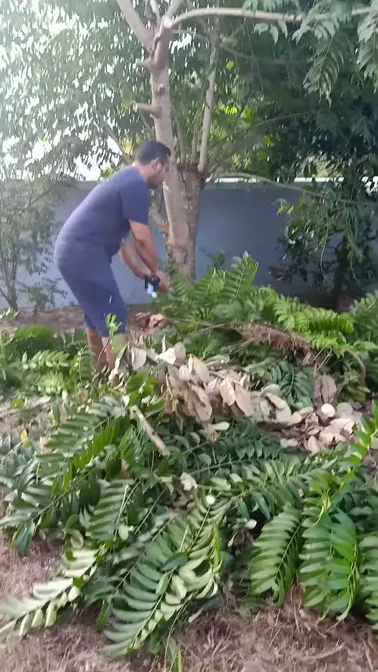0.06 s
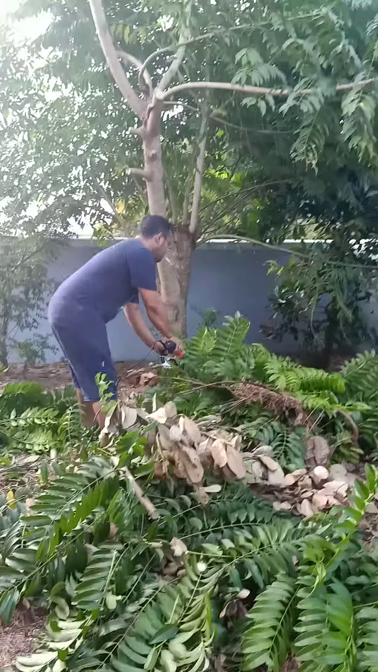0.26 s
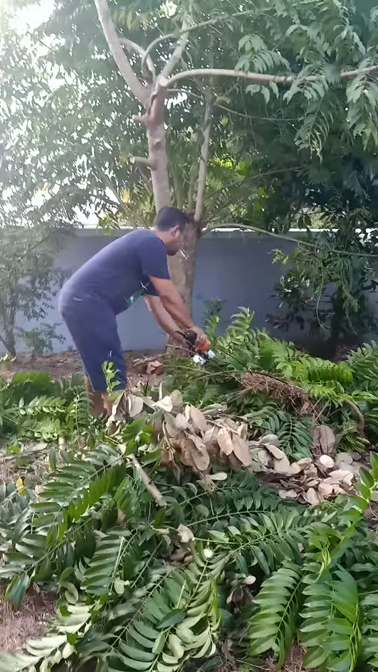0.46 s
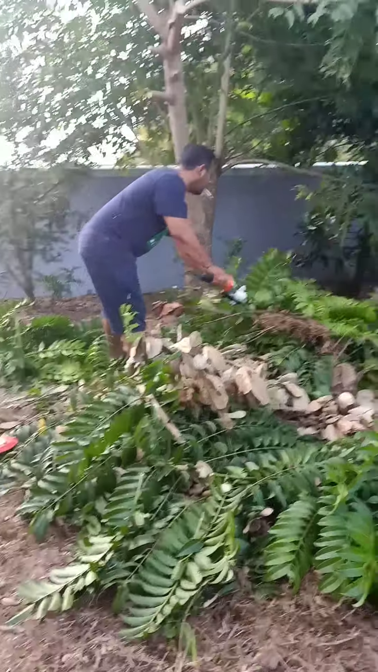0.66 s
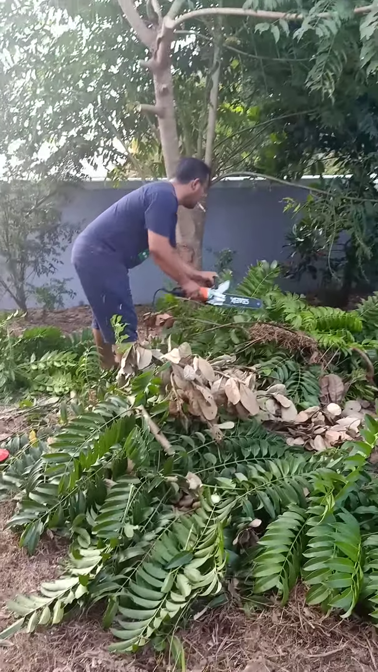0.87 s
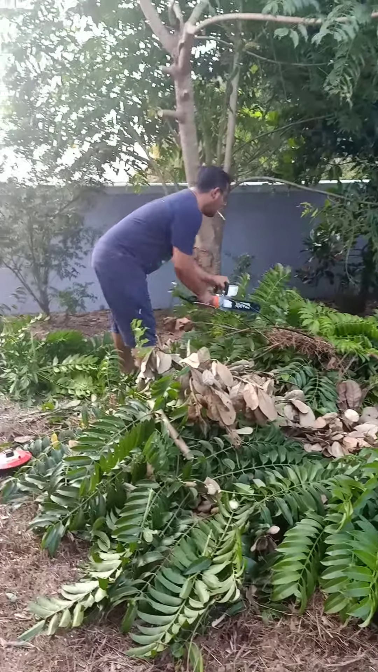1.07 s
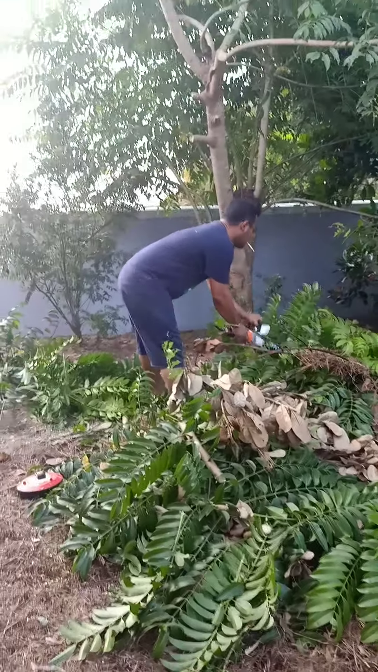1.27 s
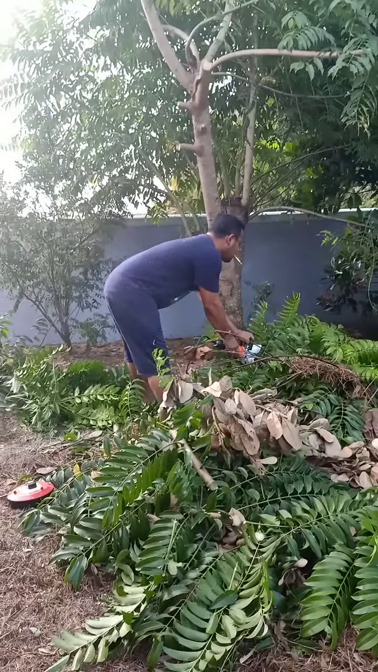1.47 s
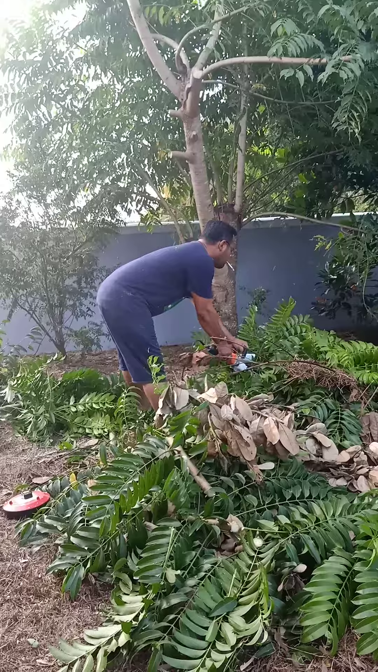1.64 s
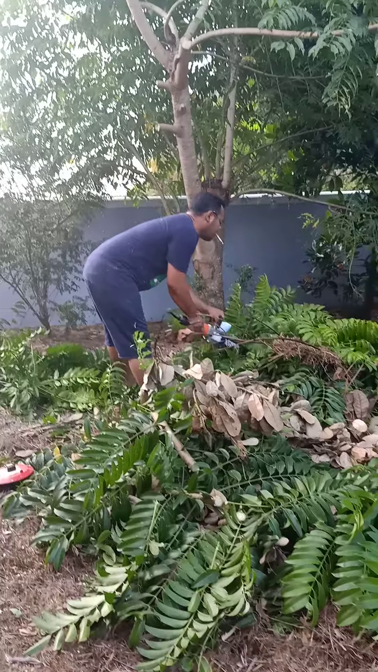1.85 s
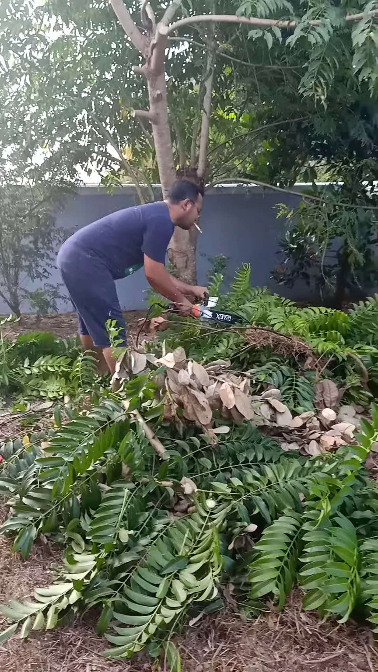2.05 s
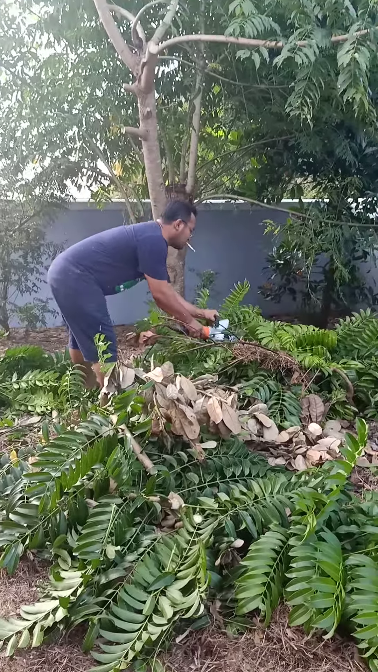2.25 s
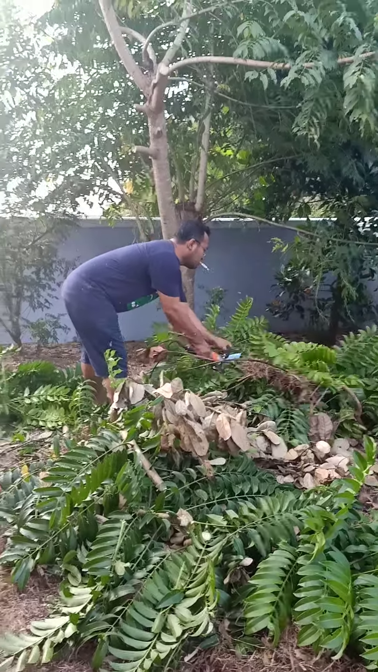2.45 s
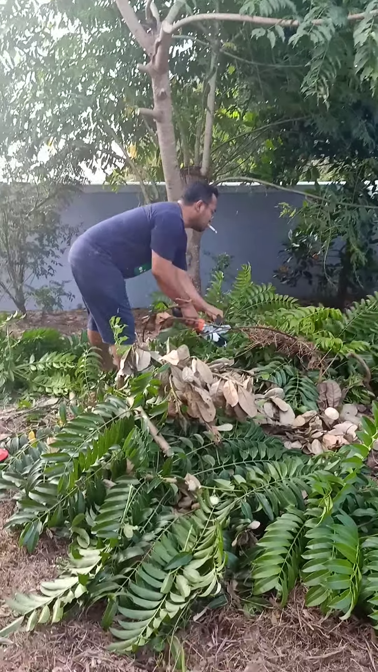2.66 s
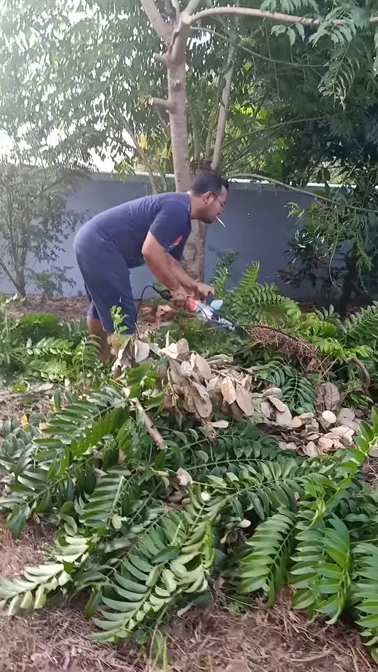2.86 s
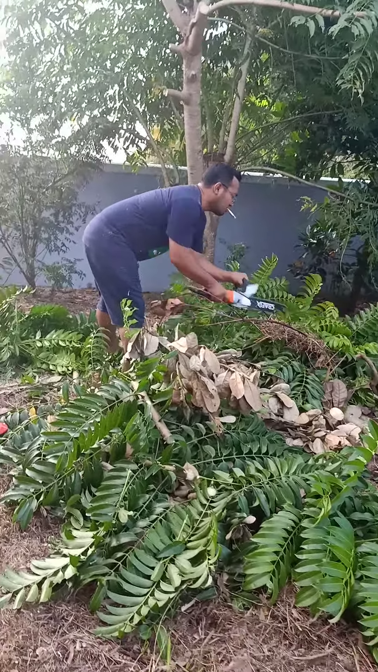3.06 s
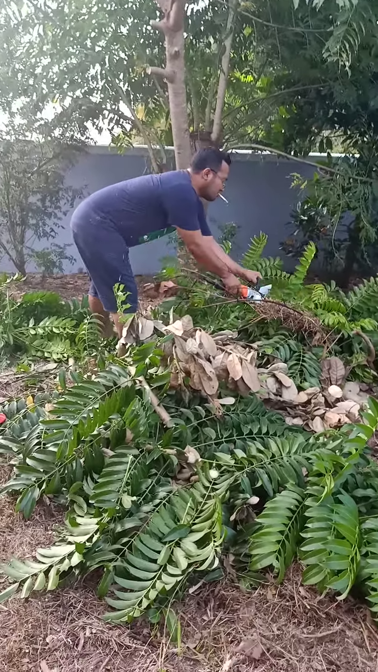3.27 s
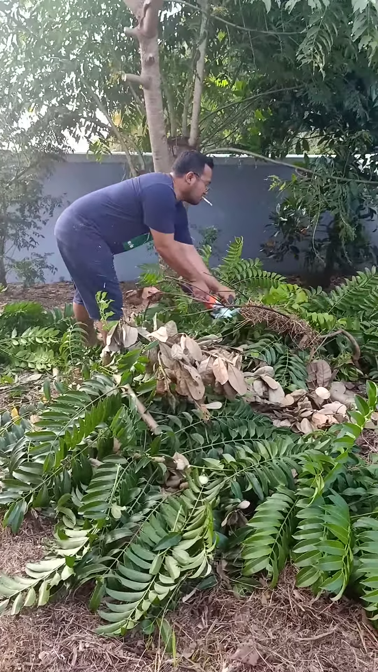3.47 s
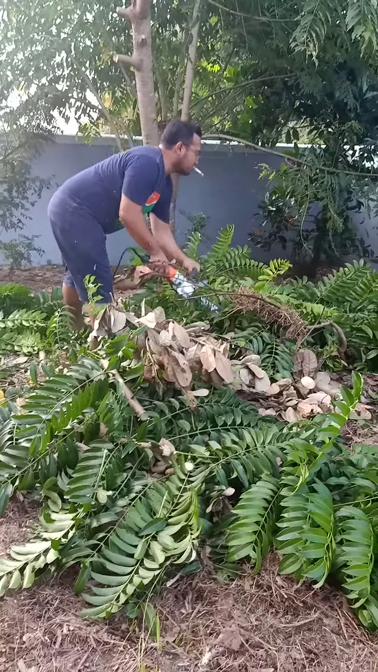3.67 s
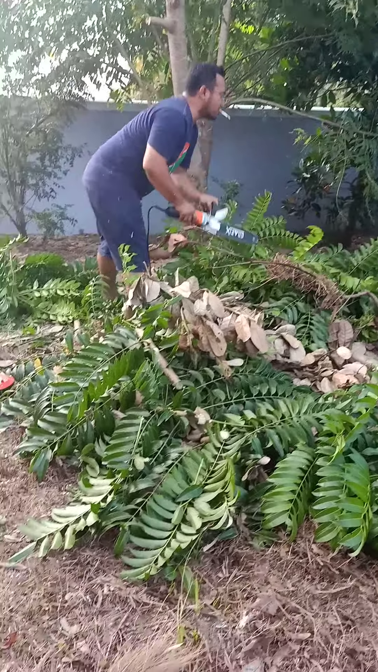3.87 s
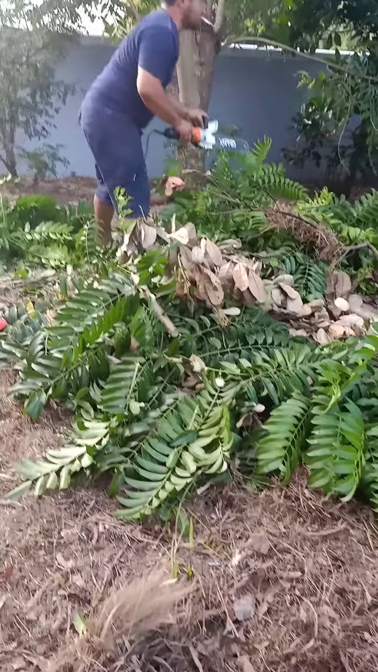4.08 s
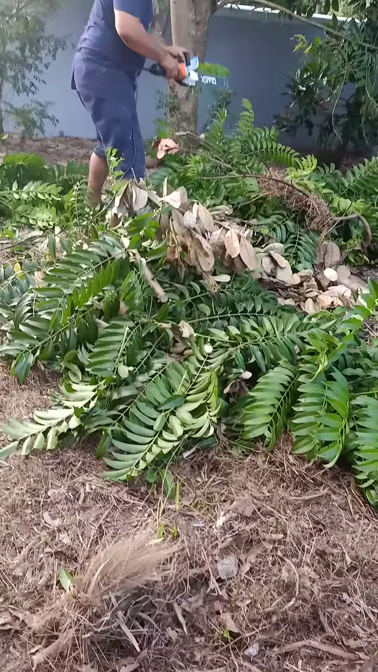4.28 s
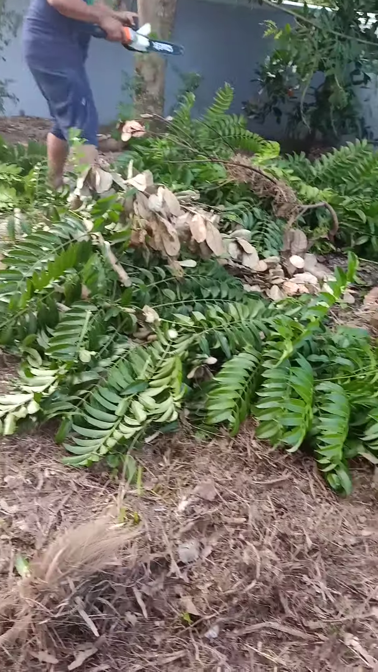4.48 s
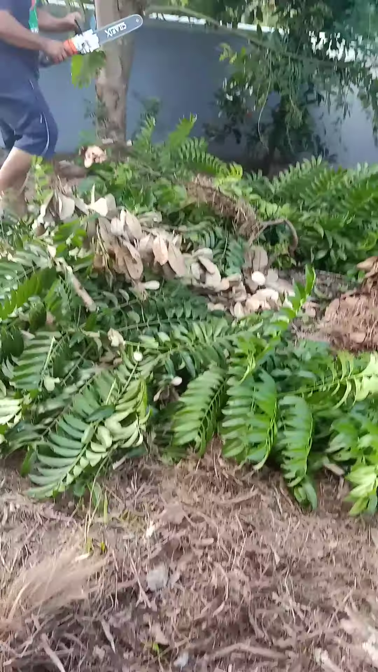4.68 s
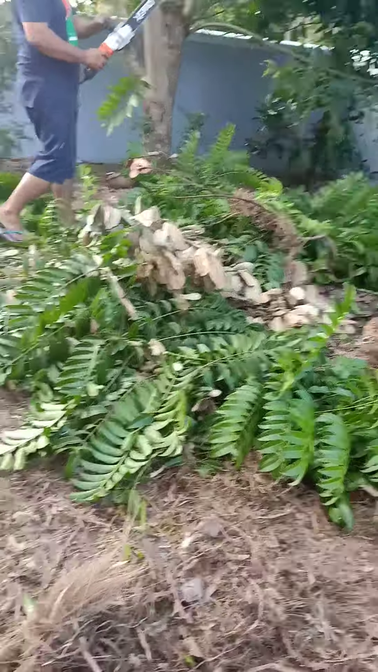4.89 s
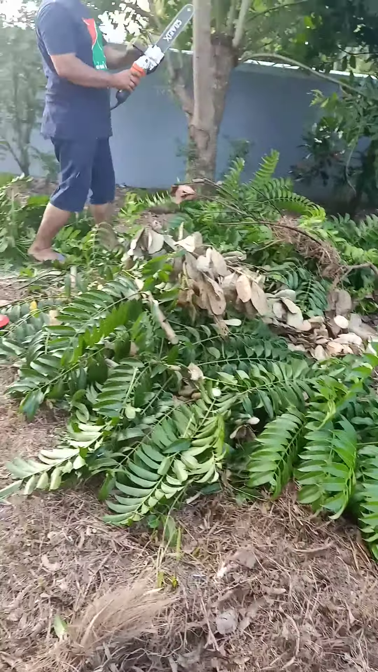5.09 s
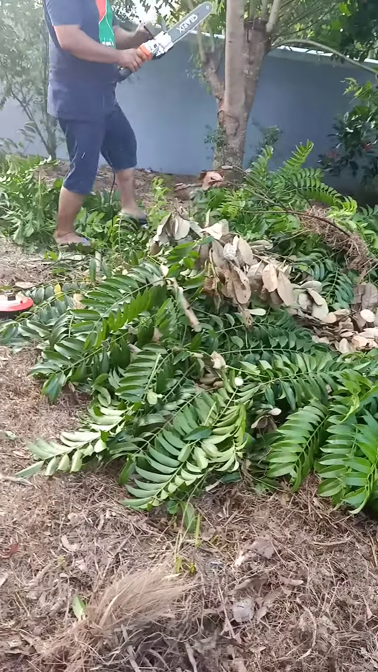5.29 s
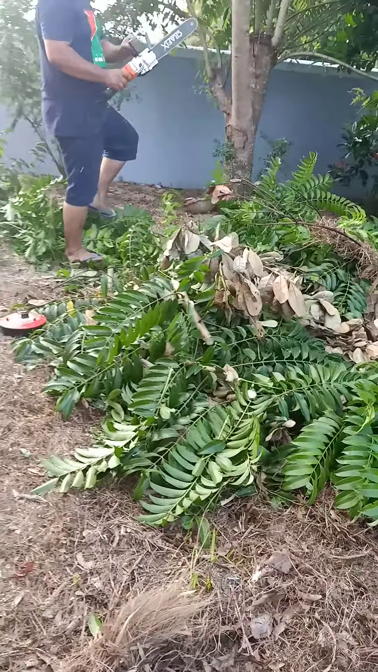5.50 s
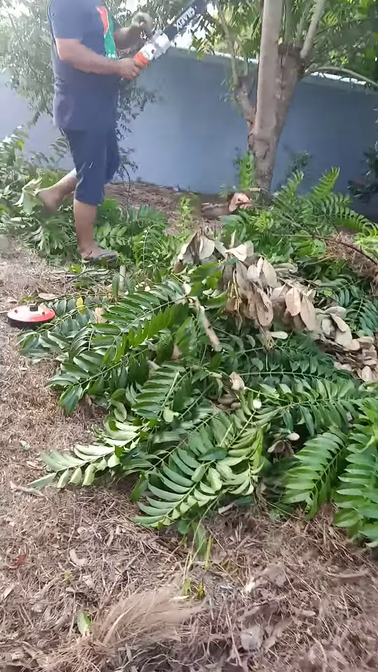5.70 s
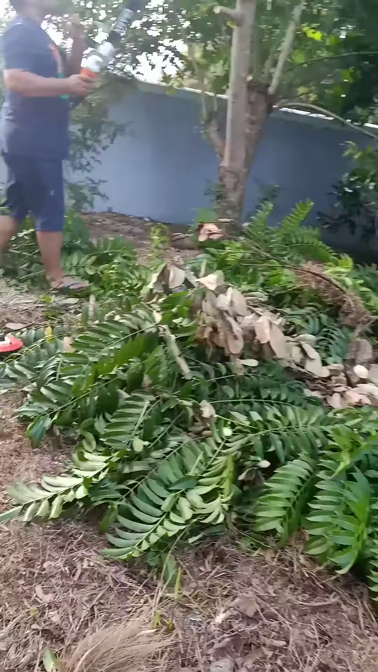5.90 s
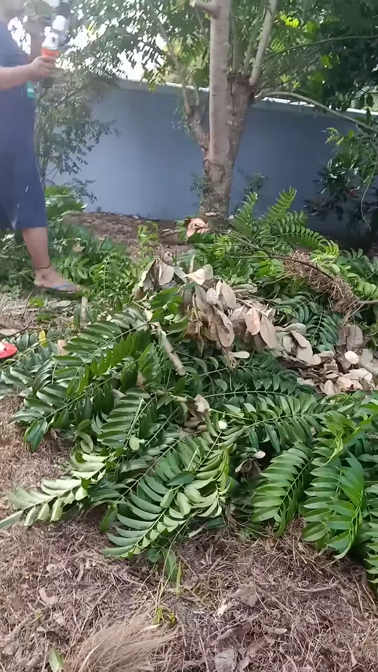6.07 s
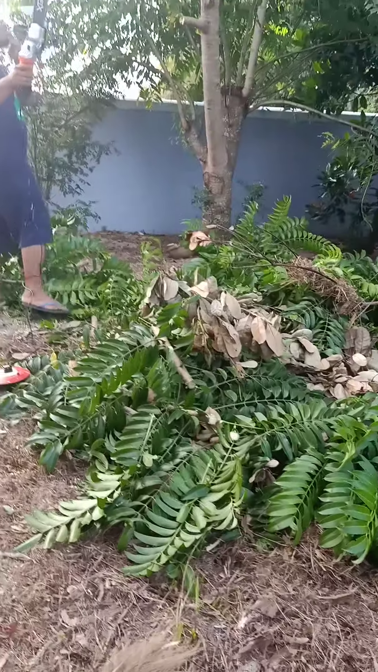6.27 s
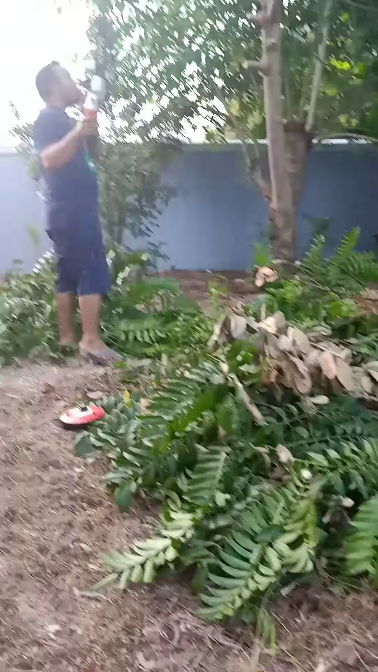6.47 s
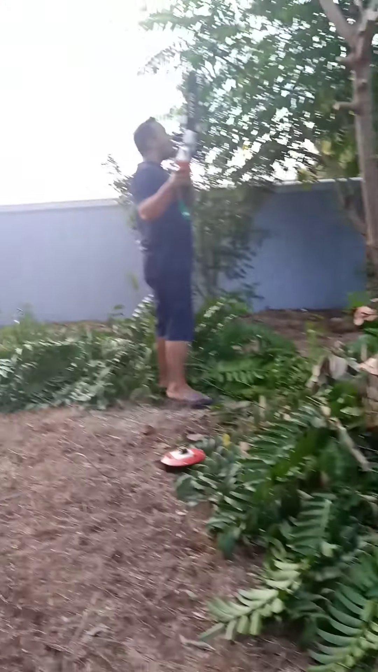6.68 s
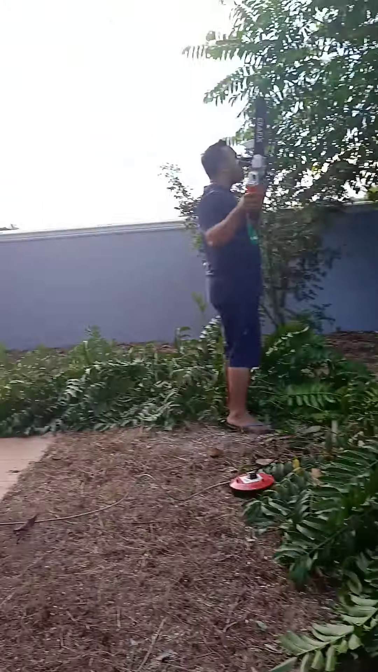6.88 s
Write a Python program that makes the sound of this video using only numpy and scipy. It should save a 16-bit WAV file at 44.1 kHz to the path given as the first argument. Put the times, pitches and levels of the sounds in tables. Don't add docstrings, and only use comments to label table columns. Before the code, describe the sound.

Close outdoors, a small electric chainsaw runs at full speed, a steady whine with harsh metallic chain hiss and case rattle. Its pitch sags briefly at several cuts, with chips spraying and dull branch knocks. After about four seconds it is switched off and slides down to a stop, leaving low distant traffic hum, shrill insects, snapping twigs and a few quick bird whistles. Handheld stereo phone a few metres away.

```python
import sys
import numpy as np
from scipy import signal
from scipy.fft import rfft, irfft, next_fast_len
from scipy.io import wavfile
from scipy.ndimage import uniform_filter1d, map_coordinates

SR = 44100
rng = np.random.default_rng(int(sys.argv[2]) if len(sys.argv) > 2 else 0)


def waveform_to_disk(signal):
    frames = np.transpose(np.atleast_2d(signal))
    scaled = np.clip(frames, -1, 1) * 32767
    samples = np.round(scaled).astype(np.int16)
    wavfile.write(sys.argv[1], SR, samples)


def elevation(decibels):
    levels = np.asarray(decibels, float)
    return 10 ** (levels / 20)


N = 306054

# frequency in Hz, level per Hz in dB.
GARDEN_COLOUR = [(15, -50), (30, -26), (86, -1), (216, -7), (361, -6), (688, -11.5), (1460, -19.5),
                 (2300, -10.5), (3200, -25), (5640, -32.5), (7200, -22.5), (10000, -30.5), (13000, -46),
                 (15600, -50)]
# frequency in Hz, likeness from 0 to 1.
GARDEN_LIKENESS = [(60, 1), (180, 0.89), (550, 0.71), (1650, 0.02), (4970, 0.11), (15000, 0.02)]
# frequency in Hz, left minus right in dB.
GARDEN_LEAN = [(60, 0), (150, -1), (380, -2), (950, -0.5), (2380, 0), (5980, 4.5), (15000, -6)]
# centre in Hz, width in Hz, gain in dB.
INSECTS = (7100, 500, 5.2)
# pitch in Hz, wander in Hz, level in dB, start in seconds, end in seconds.
FAR_MACHINES = [
    (106, 5, -71, -1, 8),
    (200, 3, -74, -1, 8),
    (146, 3, -66, .25, 1),
    (264, 1.5, -67, 6.3, 8),
    (441, 3, -77, 5.8, 8),
    (352, 3, -76, 6.3, 8),
    (533, 2, -77, 6.3, 8),
]
# start in seconds, length in seconds, first
# pitch in Hz, last pitch in Hz, peak in dB.
BIRD_NOTES = [(6.155, .055, 15300, 13900, -78), (6.275, .04, 2000, 1980, -74),
              (6.31, .035, 2050, 2700, -74), (6.325, .045, 1580, 1750, -70), (6.352, .042, 1900, 3080, -62),
              (6.386, .05, 3080, 2850, -67), (6.36, .03, 1980, 1850, -59), (6.385, .11, 1800, 1600, -71),
              (6.43, .075, 2600, 3030, -69), (6.505, .04, 2450, 2150, -69), (6.545, .06, 3500, 3900, -75),
              (6.573, .02, 2220, 2250, -67), (6.594, .026, 2240, 2120, -68), (6.608, .047, 3350, 4000, -74),
              (6.72, .026, 1980, 2220, -64), (6.74, .02, 2180, 2400, -55.5),
              (6.757, .02, 2430, 2720, -57.5), (6.777, .022, 2500, 2450, -65),
              (6.801, .02, 2400, 2600, -50.5), (6.812, .05, 2300, 1900, -72),
              (6.804, .036, 2450, 3130, -59), (6.838, .04, 3100, 3140, -70)]
# start in seconds, peak in dB, left minus right in dB.
TWIG_SNAPS = [(6.0844, -47, -1.0), (6.2594, -58, 0.5), (6.3194, -57, -4), (6.37, -62, 1.5),
              (6.42, -61, -1.5), (6.47, -62, 1.5), (6.51, -61, 0.5), (6.544, -49.5, 0.5), (6.561, -49.5, 4),
              (6.5844, -51, -2), (6.6014, -56, 1.0)]
# start in seconds, peak in dB, pitch in Hz.
BRANCH_BUMPS = [
    (.945, -45, 262),
    (1.515, -44, 345),
    (2.59, -46, 310),
    (3.55, -50, 300),
    (5.84, -58, 420),
    (6.13, -56, 1720),
]
# start in seconds, length in seconds,
# turns per second lost each second.
CUTS = [
    (.34, .13, 144),
    (.53, .24, 33),
    (.77, .3, 15),
    (1.38, .18, 45),
    (1.56, .19, 164),
    (2.18, .29, 27),
    (2.47, .09, 225),
    (2.56, .12, 70),
    (3.4, .1, 150),
    (3.5, .14, 70),
]
# middle in
# seconds, half length in seconds, rise in dB.
BURSTS_AND_SWELLS = [
    (0.396, 0.057, 7),
    (0.512, .06, 3),
    (1.634, 0.097, 4),
    (2.484, 0.069, 5),
    (2.63, 0.094, 4),
    (3.43, 0.047, 5.5),
    (3.573, .11, 3.5),
    (5.38, .06, 3),
    (5.955, .09, 8),
    (6.17, 0.16, 7),
]
# time in seconds, nearness in dB, bar turned to the phone in dB.
HELD = [(.05, -2.5, 0.5), (.45, 0.95, -0.1), (.75, 1, 0.3), (1.2, 0.5, -0.3), (1.45, -0.5, 0.7),
        (1.62, 0.4, 0.2), (1.82, -1.5, .5), (2.02, -0.1, 1), (2.5, 1.5, -0.4), (2.75, 0, 0.1),
        (3.0, 1.3, 0.6), (3.55, -0.2, -0.4), (3.78, .5, -.5), (4.02, 2, 0.6), (4.5, -1.5, .8),
        (4.8, 2, 0.5), (5.2, -1.4, 1), (6.0, 1.5, 0.5)]
# time in seconds, unbalance in dB, second order in dB.
GRIP = [(0.05, -63.5, -53), (.3, -61, -45), (.5, -55, -46), (.66, -67, -70), (1.0, -56, -49),
        (1.25, -62.5, -57), (1.5, -70, -55), (1.8, -58.5, -53), (2.15, -64, -49.5), (2.45, -60, -50.5),
        (2.85, -60, -48), (3.0, -60, -54), (3.12, -60, -61), (3.25, -63, -52.5), (3.39, -58, -45.5),
        (3.51, -69, -59), (3.75, -59, -57.5), (4.15, -55.5, -50.5)]
# frequency in Hz, level per Hz in dB.
WOOD_COLOUR = [(120, -26), (200, -17), (383, -14.5), (453, -10), (679, -7.5), (912, -1), (1120, -0.5),
               (1500, -0.5), (1950, -22), (3300, -120)]
# frequency in Hz, level per Hz in dB.
CASE_COLOURS = [
    [(740, -46.5), (1250, -18), (1370, -10), (1530, -9), (1660, -6.5), (1870, -3.5), (2310, -1), (3500, -11.5), (4550, -54), (7700, -120)],
    [(740, -49), (1250, -23), (1540, -10), (1660, -6), (1860, -2), (2460, 0.5), (3410, -12), (3500, -18), (4550, -53), (7700, -120)],
]
# frequency in Hz, level per Hz in dB.
SPROCKET_COLOURS = [
    [(1940, -20.5), (3300, -3), (3730, 0.5), (5240, -3.5), (6300, -6.5), (8190, -12.5), (13900, -120)],
    [(1940, -28), (3300, -5), (3740, -1), (4460, -8.5), (5430, -12.5), (6300, -7.5), (8190, -27), (13900, -120)],
]
# frequency in Hz, level per Hz in dB.
BAR_COLOURS = [
    [(5000, -56), (6200, -7.5), (7400, -2), (9100, 1), (9800, -3.5), (11600, -3.5), (12200, -13.5), (13000, -7), (13500, -6.5), (14300, -13.5), (15000, -8), (15450, -7), (15650, -5)],
    [(5000, -50.5), (6200, -17), (7200, -2.5), (7800, -2), (8300, 2.5), (9200, -0.5), (9800, -5.5), (11200, -7.5), (12800, -13), (13700, -10), (14800, -14), (15450, -6), (15650, -21)],
]
# start in seconds, end in seconds.
POWER_TO_COAST = (3.9, 4.96)
# frequency in Hz, width in Hz, gain in dB.
METAL_RINGS = [
    (752, 81, -3.5),
    (1679, 49, 1),
    (2024, 40, -19),
    (2337, 45, -2.5),
    (2570, 54, -2.5),
    (2816, 95, 0),
    (3030, 81, -3),
    (3740, 190, -16.5),
    (7120, 89, -3),
]
# time in seconds, left lag in milliseconds, left minus right in dB.
SAW_DIRECTION = [(0, 0.027, 0.5), (1.5, 0.024, 0), (3, 0.015, 0), (4, 0.067, -0.1), (4.6, 0.24, -0.5),
                 (6.94, 0.16, 1)]
# frequency in Hz, share from 0 to 1.
DIRECT_SHARE = [(300, 0.95), (700, 0.51), (1500, 0.53), (3000, 0.29), (7000, 0.2), (15000, 0)]
# frequency in Hz, left minus right in dB.
SAW_LEAN = [(100, -1), (300, 2.5), (650, -2.5), (1400, 0), (2800, -1), (5500, 4), (9500, -4), (14000, 0)]

FREE_HZ = 477


def unit(x):
    return x / np.sqrt(np.mean(x ** 2) + 1e-20)


def along(points, hz):
    f, v = np.transpose(points)
    return np.interp(np.log(hz + 1), np.log(f + 1), v)


def curves(rows):
    s, *columns = np.transpose(rows)
    return [np.interp(np.arange(N) / SR, s, column) for column in columns]


def wobble(rate):
    at = np.arange(0, N + 16, 16)
    points = rng.standard_normal(int(N * rate / SR) + 4)
    return np.interp(np.arange(N), at, map_coordinates(points, [at * rate / SR]))


def lagged(x, tau_s):
    k = np.exp(-1 / (tau_s * SR))
    return signal.lfilter([1 - k], [1, -k], x)


def filtered(x, response):
    m = next_fast_len(N + 8192)
    return irfft(rfft(x, m) * response(np.fft.rfftfreq(m, 1 / SR)), m)[..., :N]


def leaned(x, table):
    return filtered(x, lambda f: elevation([along(table, f) / 2, -along(table, f) / 2]))


def scattered(x, t60):
    t = np.arange(SR // 3) / SR
    tail = rng.standard_normal((2, len(t))) * elevation(-60 * t / t60)
    tail = tail / np.linalg.norm(tail, axis=1, keepdims=True)
    return signal.fftconvolve(x[None], tail, axes=1)[:, :N]


def far_machines():
    t = np.arange(N) / SR
    drone = np.zeros(N)
    for hz, wander_hz, db, start, end in FAR_MACHINES:
        gate = np.clip(np.minimum(t - start, end - t) / 0.1, 0, 1)
        level = elevation(db + 3 + 1.5 * wobble(6))
        drone += gate * level * np.sin(2 * np.pi * np.cumsum(hz + wander_hz * wobble(8)) / SR)
    return drone


def garden():
    insect_hz, width_hz, insect_db = INSECTS

    def colour(f):
        return elevation(along(GARDEN_COLOUR, f) + insect_db * np.exp(-((f - insect_hz) / width_hz) ** 2))

    def middle_and_side(f):
        angle = np.arccos(np.clip(along(GARDEN_LIKENESS, f), -1, 1)) / 2
        return colour(f) * [np.cos(angle), np.sin(angle)]

    mid, side = filtered(rng.standard_normal((2, N)), middle_and_side)
    air = elevation(-61.5 + 0.87 * wobble(1.9)) * unit(np.array([mid + side, mid - side]))
    return leaned(air, GARDEN_LEAN) + far_machines()


def birds():
    glide_s, attack_s, release_s, sag_db_per_s = 0.034, 0.007, 0.01, 130
    song = np.zeros(N)
    tremble = 1 + 0.012 * wobble(180)
    flutter_db = 3 * wobble(110)
    for s, length, from_hz, to_hz, db in BIRD_NOTES:
        t = np.arange(round(length * SR)) / SR
        here = slice(round(s * SR), round(s * SR) + len(t))
        glide = np.sin(np.pi / 2 * np.clip(t / min(glide_s, length), 0, 1)) ** 2
        hz = from_hz + (to_hz - from_hz) * glide
        gate = np.clip(np.minimum(t / attack_s, (length - t) / release_s), 0, 1)
        level = gate * elevation(db + 4 - sag_db_per_s * t + flutter_db[here])
        song[here] += level * np.sin(2 * np.pi * np.cumsum(hz * tremble[here]) / SR)
    return song * elevation([[-2.5], [0.6]]) + elevation(-1.0) * scattered(song, t60=0.4)


def twig():
    out = np.zeros((2, N + SR))
    t = np.arange(SR // 10) / SR
    snap_and_rustle = elevation(-60 * t / 0.042) + 0.46 * elevation(-60 * t / 0.15)
    shape = snap_and_rustle * (1 - np.exp(-t / 0.002))
    for s, db, pan in TWIG_SNAPS:
        level = elevation(db + 2 + np.array([[pan / 2], [-pan / 2]]))
        out[:, round(s * SR):][:, :len(t)] += level * shape * rng.standard_normal((2, len(t)))
    return filtered(out[:, :N], lambda f: f / (f + 4000) / (1 + (f / 11000) ** 2))


def bumps():
    out = np.zeros(N + SR)
    t = np.arange(SR // 8) / SR
    for s, db, hz in BRANCH_BUMPS:
        shape = elevation(db + 2 - 60 * t / 0.14) * (1 - np.exp(-t / 0.005))
        out[round(s * SR):][:len(t)] += shape * np.sin(2 * np.pi * hz * t)
    return out[:N]


def drag():
    t = np.arange(N) / SR
    return sum(rate * ((t >= s) & (t < s + length)) for s, length, rate in CUTS)


def armature():
    recover_s, first_sag_hz = 0.43, 12.5
    off_s, coast_s = 4.155, 1.7
    friction_hz = 185
    t = np.arange(N) / SR
    sag = recover_s * lagged(drag(), recover_s) + first_sag_hz * np.exp(-t / recover_s)
    off = np.clip(t - off_s, 0, None)
    speed = (FREE_HZ - sag + friction_hz) * np.exp(-off / coast_s) - friction_hz
    return np.clip(speed, 4, None), sag, off


def motor():
    speed, sag, off = armature()
    slow_db = 20 * np.log10((speed + sag) / FREE_HZ)
    unbalance_db, second_db = curves(GRIP)
    unbalance_db = unbalance_db + 6.5 * slow_db
    second_db = second_db + 5 * slow_db
    bars_db = -42 + 0.8 * sum(curves(HELD)) - 0.0105 * sag ** 2 - 260 * off
    unsteady = 1 + 0.0018 * wobble(200) + 0.0013 * wobble(30)
    turn = 2 * np.pi * np.cumsum(speed * unsteady) / SR
    lines = [(1, unbalance_db + 1.5), (2, second_db - 1), (3, second_db - 3),
             (12, bars_db - 9.5), (24, bars_db + 1.5)]
    tone = sum(elevation(db + 0.95 * wobble(40)) * np.sin(order * turn) for order, db in lines)
    return np.sqrt(2) * tone, speed


def swells():
    t = np.arange(N) / SR
    return sum(db * np.exp(-((t - s) / half_s) ** 2) for s, half_s, db in BURSTS_AND_SWELLS)


def knocks(speed, per_turn, spread_db, hiss):
    chance = per_turn * speed / SR
    struck = rng.random((3, N)) < chance
    strength = elevation(spread_db * rng.standard_normal((3, N)))
    blows = struck * strength * rng.choice([-1, 1], (3, N))
    return unit(blows / np.sqrt(chance)) + hiss * rng.standard_normal((3, N))


def ringing(x, drift_db):
    hz, _, z = signal.stft(x, SR, nperseg=1024)
    rings = 1
    for centre, width, db in METAL_RINGS:
        rings = rings + elevation(db) * 1j * hz * width / (centre * centre - hz * hz + 1j * hz * width)
    field = uniform_filter1d(rng.standard_normal(z.shape[1:]), size=2, axis=0)
    field = uniform_filter1d(field, size=12, axis=1)
    z = z * abs(rings)[:, None] * elevation(drift_db * unit(field))
    return signal.istft(z, SR, nperseg=1024)[1][:, :N]


def saw(speed):
    near_db, aim_db = curves(HELD)
    speed_db = 20 * np.log10(speed / FREE_HZ)
    wood_db = -46 + speed_db + swells() + 0.24 * near_db
    case_db = -34 + 1.03 * speed_db + near_db - aim_db
    sprocket_db = -37.5 + 1.1 * speed_db + 0.64 * near_db
    bar_db = -31.5 + 1.24 * speed_db + near_db + aim_db
    coasting_share = np.interp(np.arange(N) / SR, POWER_TO_COAST, [0, 1])

    def tint(drive, colour):
        return unit(filtered(drive, lambda f: elevation(along(colour, f))))

    def power_to_coast(drive, colours):
        return (1 - coasting_share) * tint(drive, colours[0]) + coasting_share * tint(drive, colours[1])

    shake_db = 0.5 * wobble(14) + 0.1 * wobble(80)
    teeth = knocks(speed, 1.5, spread_db=2.5, hiss=0.94)
    gears = knocks(speed, 3.5, spread_db=3, hiss=1.23)
    links = knocks(speed, 7.5, spread_db=3, hiss=1.15)
    wood = elevation(wood_db) * tint(teeth, WOOD_COLOUR)
    case = elevation(case_db + 0.35 * wobble(9.8)) * power_to_coast(gears, CASE_COLOURS)
    sprocket = elevation(sprocket_db) * power_to_coast(links, SPROCKET_COLOURS)
    bar = elevation(bar_db) * power_to_coast(links, BAR_COLOURS)
    return elevation(shake_db) * ringing(wood + case + sprocket + bar, drift_db=2.0)


def ports(tone, noise):
    lag_ms, pan_db = curves(SAW_DIRECTION)
    half_lag = lag_ms * SR / 2000

    def share(f):
        return np.clip(along(DIRECT_SHARE, f), 0, 1)

    source = tone + filtered(noise[0], lambda f: np.sqrt(share(f)))
    direct = np.array([map_coordinates(source, [np.arange(N) - way * half_lag], order=3) for way in (1, -1)])
    wet_noise = filtered(noise[1:], lambda f: np.sqrt(1 - share(f)))
    wet_tone = elevation(-11) * tone * np.array([wobble(25), wobble(25)])
    return leaned(direct + wet_noise + wet_tone, SAW_LEAN) * elevation([pan_db / 2, -pan_db / 2])


def scene():
    background = garden() + birds() + twig()
    tone, speed = motor()
    return background + ports(tone + bumps(), saw(speed))


def top_cut(x):
    return signal.sosfilt(signal.butter(12, 16860, fs=SR, output="sos"), x)


def record(dry):
    def response(f):
        top = np.sin(np.pi / 2 * np.clip((15600 - f) / 100, 0, 1)) ** 2
        return top * f ** 2 / (f ** 2 + 45 ** 2)

    heard = filtered(dry, response)
    return top_cut(heard)


dry = scene()
out = record(dry)
waveform_to_disk(out)
```